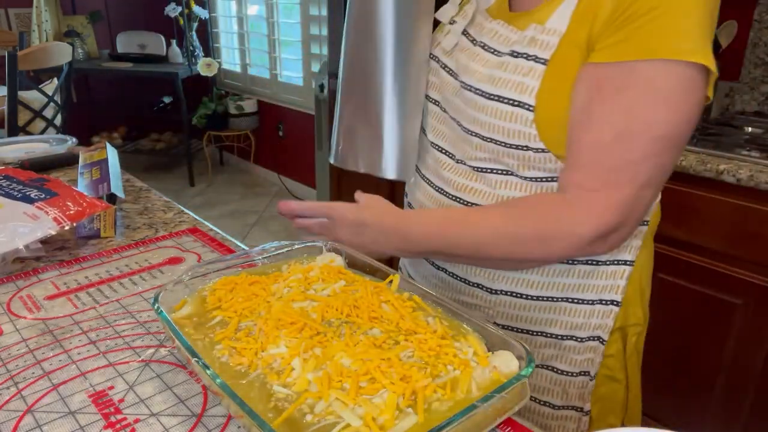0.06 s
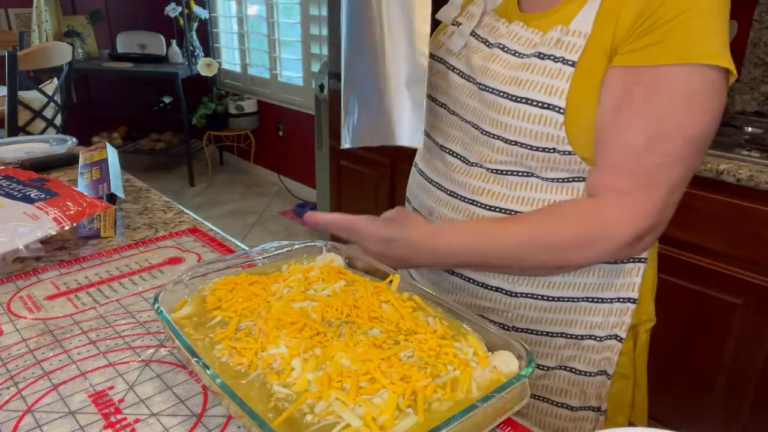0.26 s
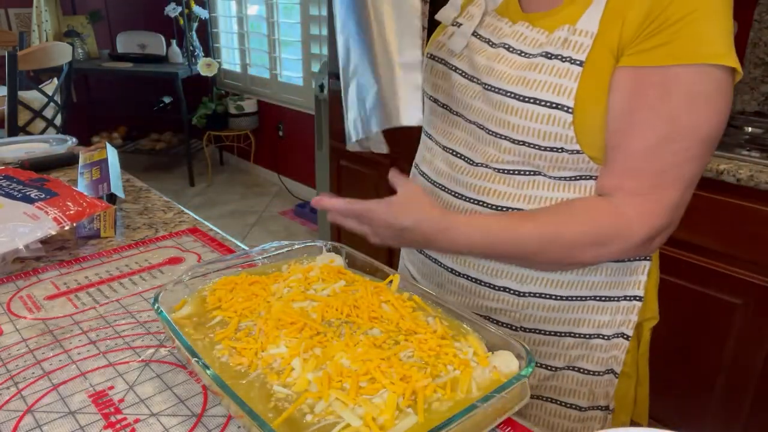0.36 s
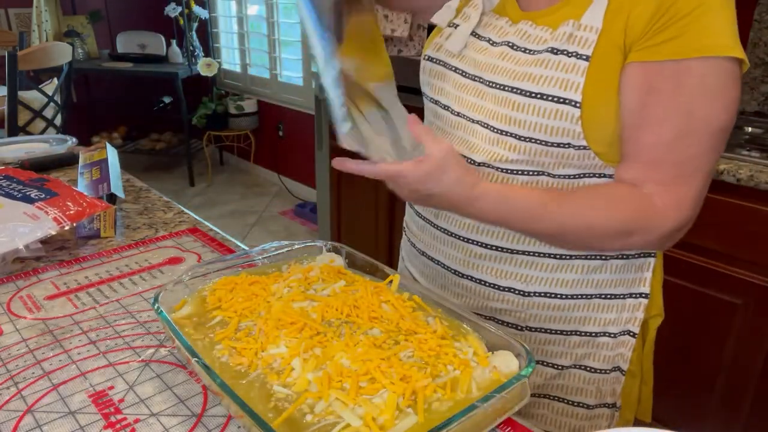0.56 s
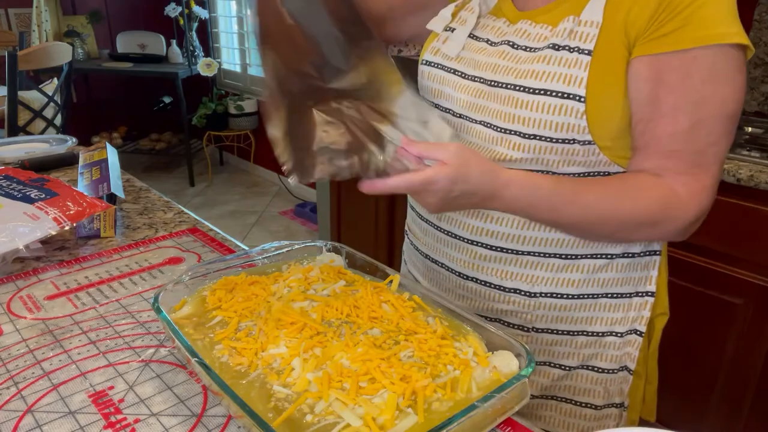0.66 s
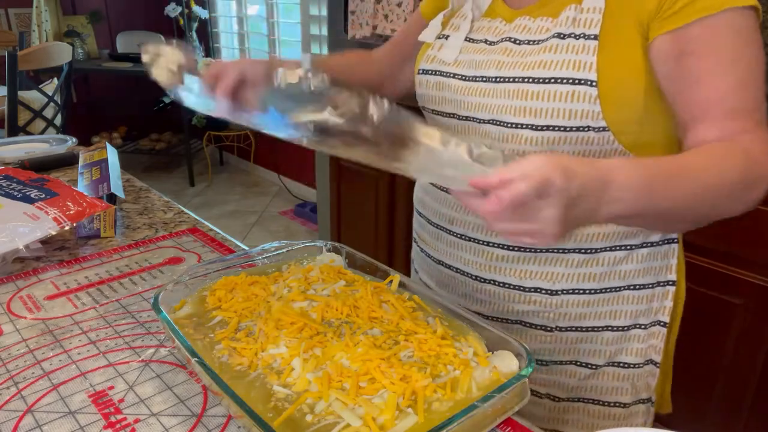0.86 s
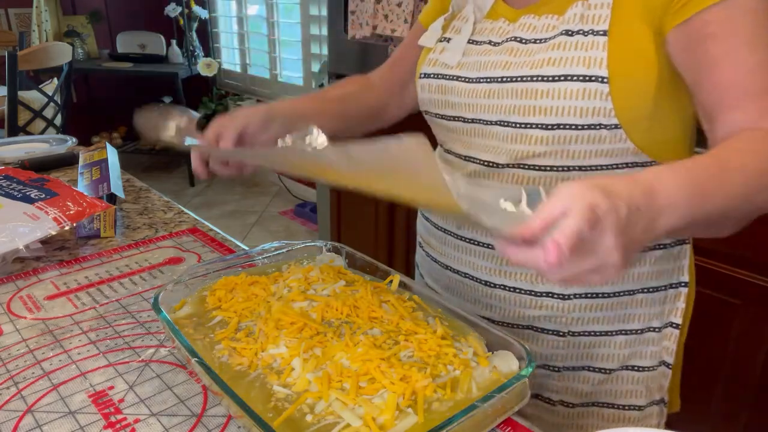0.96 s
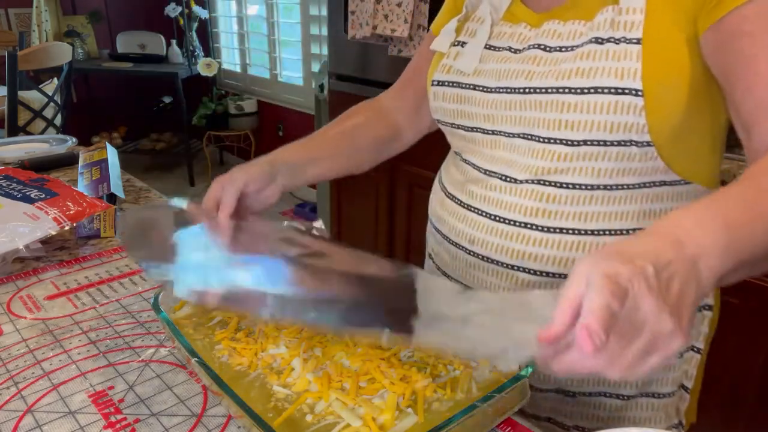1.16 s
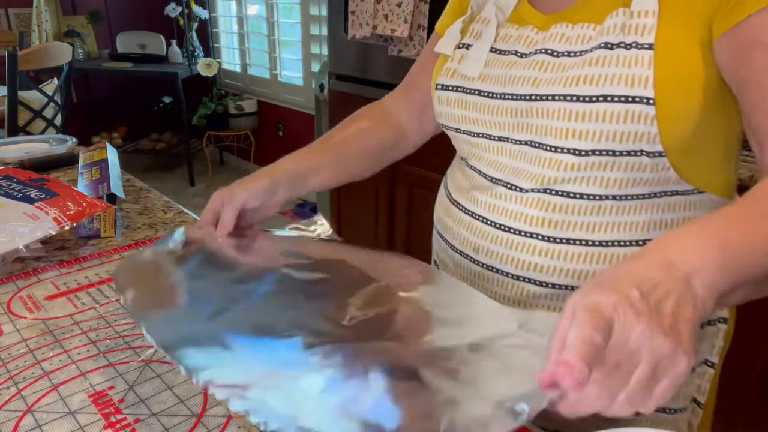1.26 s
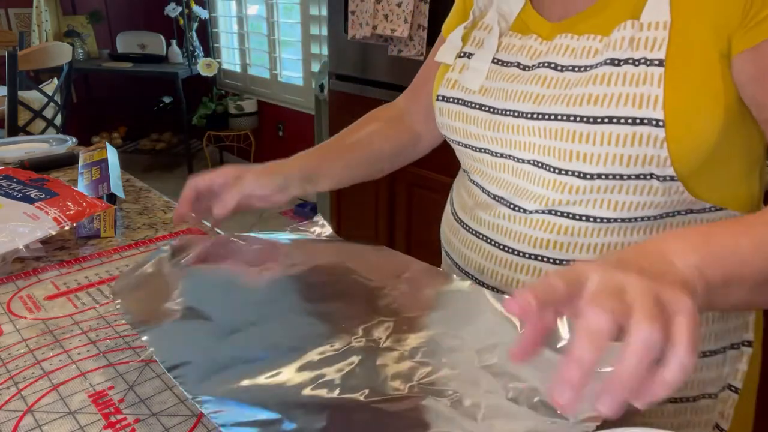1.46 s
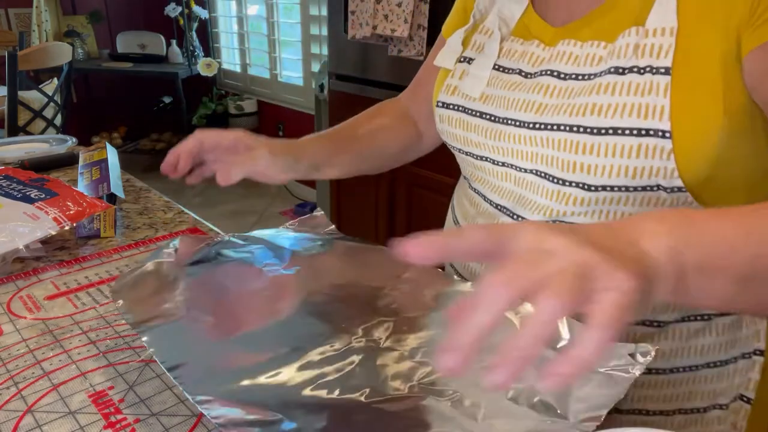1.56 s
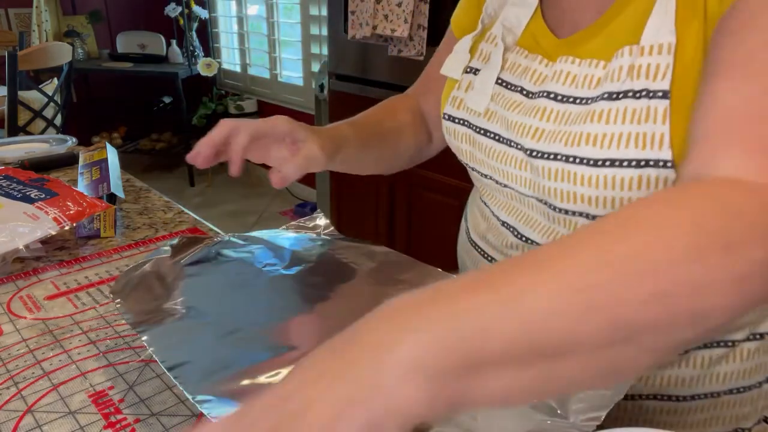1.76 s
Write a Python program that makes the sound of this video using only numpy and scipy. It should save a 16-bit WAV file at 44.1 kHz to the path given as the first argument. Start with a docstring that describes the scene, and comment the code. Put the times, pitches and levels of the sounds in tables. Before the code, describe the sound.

Aluminium foil crinkles in a kitchen with low machine hum. Faint rustles come first, with two dull knocks and soft thumps from 0.2 to 0.45 s. From 0.55 s crackling grows, loudest and brightest at 0.62-0.82 s with sharp snaps. Lighter rustling continues, with a crisp tick near 0.97 s and fresh crumpling at 1.1-1.45 s, fading by 1.5 s into the room's short ring and quiet hum.

```python
"""Aluminium foil is lifted, spread and laid over a glass dish: each move of the hands is a shower of clicks.
Between moves the sheet rustles, its panels flex with a duller crackle, and a few creases snap as single clicks.
Early on something is bumped: dull knocks of short modes and low noise, and soft thumps of swelling noise.
The place is a lively kitchen with low machine noise and steady hum tones, heard through a microphone pair."""
import sys
import numpy as np
from scipy import signal
from scipy.fft import rfft, irfft
from scipy.io import wavfile
from scipy.ndimage import uniform_filter1d

SR = 44100
rng = np.random.default_rng(int(sys.argv[2]) if len(sys.argv) > 2 else 0)


def dump_mix(stems):
    """Bounce the given channels to the path in sys.argv[1] as a 16-bit WAV at rate SR."""
    frames = np.atleast_2d(stems).T  # one column per channel
    limited = np.clip(frames, -1, 1)  # hard clip at full scale
    pcm = np.round(limited * 32767).astype(np.int16)
    wavfile.write(sys.argv[1], SR, pcm)


N = 79380  # samples, 1.8 s


def amp(db):
    """Turns decibels into an amplitude factor."""
    return 10 ** (np.asarray(db) / 20)


def unit(x):
    """Scales to rms 1."""
    return x / np.sqrt(np.mean(x ** 2) + 1e-20)


def read(points, hz):
    """Reads a table on a logarithmic frequency axis."""
    f, value = np.transpose(points)
    return np.interp(np.log(hz + 1), np.log(f + 1), value)


def add(mix, start_s, sound):
    """Mixes a sound in at its start time, cut off at the end of the mix."""
    part = mix[max(round(start_s * SR), 0):][:len(sound)]
    part += sound[:len(part)]


TILT_PIVOT_HZ = 4500  # a tilt leaves this frequency unchanged


def colour(x, spectrum, tilt_db=0, size=4096):
    """A causal minimum-phase filter of unit energy, with the given spectrum and tilt in dB per octave."""
    hz = abs(np.fft.fftfreq(size, 1 / SR))
    octaves = np.log2(np.maximum(hz, 100) / TILT_PIVOT_HZ)
    gain = amp(read(spectrum, hz) + tilt_db * octaves)
    # the Hilbert transform of the log gain supplies the minimum phase
    response = np.exp(np.conj(signal.hilbert(np.log(gain))))
    taps = np.fft.ifft(response).real[:size // 2]
    return signal.fftconvolve(x, taps / np.linalg.norm(taps))[:len(x)]


# Low machine noise of the kitchen, relative spectrum: pitch_hz, density_db (per Hz)
AIR_SPECTRUM = [(20, -25.5), (45, -15.5), (75, 5), (100, -11), (130, 0.5), (165, -2.5), (240, 0), (370, -4),
                (550, -14), (1100, -19.5), (2000, -25.5), (5000, -34.5), (9000, -44.5), (16000, -71)]
# Steady tones of the room: pitch_hz, level_db (rms)
HUM_TONES = [(79, -55), (131, -53), (203, -58), (249, -55), (1152, -66)]
AIR_DB = -43  # rms in each view, before the microphones


def background():
    """Two unrelated views of shaped noise, and one sum of steady sine tones."""
    t = np.arange(N) / SR
    hum = sum(amp(db) * np.sqrt(2) * np.sin(2 * np.pi * (hz * t + rng.random())) for hz, db in HUM_TONES)
    gain = amp(read(AIR_SPECTRUM, np.fft.rfftfreq(N, 1 / SR)))
    air = [unit(irfft(rfft(noise) * gain, N)) for noise in rng.standard_normal((2, N))]
    return amp(AIR_DB) * np.array(air), hum


# How long the kitchen rings: pitch_hz, t60_s
ROOM_DECAY = [(150, 0.32), (1000, 0.37), (3500, .4), (8000, 0.29), (15000, 0.11)]


def room(x, count=3):
    """Diffuse kitchen tails, each band dying at its own speed; the moving sheet feeds them in turn."""
    noise = rng.standard_normal((count, SR * 2 // 3))
    hz, t, bands = signal.stft(noise, SR, nperseg=256)
    decay = amp(-60 * t / read(ROOM_DECAY, hz)[:, None])
    tails = signal.istft(bands * decay, SR)[1]
    tails *= np.minimum(np.arange(tails.shape[1]) / SR / 0.0013, 1)  # 1.3 ms onset
    tails /= np.linalg.norm(tails, axis=1, keepdims=True)
    # the feed of each tail swings through a half cycle in 0.16 s, evenly staggered
    half_cycles = np.arange(N) / SR / .16 + np.arange(count)[:, None] / count
    turns = np.cos(np.pi * half_cycles) * np.sqrt(2 / count)
    return signal.fftconvolve(x * turns, tails, axes=1).sum(0)[:N]


# Soft low thumps of things shifting: start_s, rise_s, decay_s (to 1/e), level_db
THUMPS = [(.222, .01, .05, -44), (.29, .015, .055, -37), (.406, .018, .042, -35)]
# Colour of a thump, relative: pitch_hz, density_db (per Hz)
THUMP_SPECTRUM = [(20, -29), (45, -14), (80, -10.5), (130, 4.5), (200, -30), (300, -4), (600, -20),
                  (2000, -68)]


def thumps():
    """Low puffs of noise that swell softly and die away."""
    t, out = np.arange(SR // 2) / SR, np.zeros(N)
    for start_s, rise_s, decay_s, level_db in THUMPS:
        envelope = np.minimum(t / rise_s, 1) * np.exp(-np.maximum(t - rise_s, 0) / decay_s)
        puff = unit(colour(rng.standard_normal(len(t)), THUMP_SPECTRUM))
        add(out, start_s, amp(level_db) * envelope * puff)
    return out


# Dull knocks: start_s, level_db (scales ring and thud), tilt_db (per octave)
KNOCKS = [(.219, -31, 0.5), (.268, -36.5, -6)]
# What the bumped thing rings with: pitch_hz, level_db (relative, before tilt), t60_s
KNOCK_MODES = [(137, -21, 0.23), (209, 11, 0.26), (244, -6, 0.76), (351.8, 11, 0.38), (450, 11, .16),
               (665, -25, .1), (688, 17, 0.05), (846, -1, 0.13), (1216, 1, 0.085)]
# Colour of the low noise in a knock, relative: pitch_hz, density_db (per Hz)
THUD_SPECTRUM = [(40, -8), (90, -15), (300, 5), (700, -2.5), (1200, -10.5), (3000, -17), (9000, -96)]
RING_DB, THUD_DB = -9, -2  # relative gains of the two parts
THUD_DECAY_S, KNOCK_RISE_S = 0.091, 0.0013  # noise decay to 1/e before colouring; linear onset


def knocks():
    """A soft blow: a puff of low noise and a few short modes."""
    t, out = np.arange(SR // 2) / SR, np.zeros(N)
    pivot_hz = KNOCK_MODES[1][0]
    for start_s, level_db, tilt_db in KNOCKS:
        ring = np.zeros(len(t))
        for hz, mode_db, t60_s in KNOCK_MODES:
            gain = amp(mode_db + tilt_db * np.log2(hz / pivot_hz))
            decay = np.exp(-np.log(1000) * t / t60_s)
            ring += gain * decay * np.sin(2 * np.pi * (hz * t + rng.random()))
        puff = rng.standard_normal(len(t)) * np.exp(-t / THUD_DECAY_S)
        thud = colour(puff, THUD_SPECTRUM, tilt_db)
        onset = np.minimum(t / KNOCK_RISE_S, 1)
        add(out, start_s, amp(level_db) * onset * (amp(RING_DB) * ring + amp(THUD_DB) * thud))
    return out


CLICKS_PER_S = 5000  # average rate
SIZE_SPREAD_DB = 2.5  # multiplied by an exponential draw of mean 1, capped at 4
CLUMP_S, CLUMP_DB = 0.0042, -1.3  # smoothing width of the clumping; level per unit of it
FACET_RING_S = 0.00093  # decay to 1/e; the facets range from 0.25 to 2 times this


def crackle(count=48):
    """A steady shower of clicks in clumps; every click rings one facet of the foil for an instant."""
    clumps = unit(uniform_filter1d(rng.standard_normal(N), max(int(CLUMP_S * SR), 1)))
    size_db = SIZE_SPREAD_DB * np.minimum(rng.exponential(1, N), 4) + CLUMP_DB * clumps
    sizes = amp(size_db) * rng.choice([-1, 1], N)
    at = np.flatnonzero(rng.random(N) < CLICKS_PER_S / SR)
    facet = rng.integers(0, count, N)[at]

    t = np.arange(SR // 300) / SR
    decay_s = FACET_RING_S * np.geomspace(.25, 2, count)[:, None]
    rings = rng.standard_normal((count, len(t))) * np.exp(-t / decay_s)
    rings /= np.linalg.norm(rings, axis=1, keepdims=True)

    # add up all overlapping rings sample by sample
    places = at[:, None] + np.arange(len(t))
    clicks = sizes[at, None] * rings[facet]
    shower = unit(np.bincount(places.ravel(), clicks.ravel(), N)[:N])
    # even out the level over 25 ms
    return shower / np.sqrt(uniform_filter1d(shower ** 2, SR // 40) + 1e-6)


# Rustle of the carried sheet, breakpoints: time_s, level_db
RUSTLE = [(.76, -54), (.81, -38.5), (.89, -34.5), (.955, -39.5), (1.01, -34.5), (1.11, -40), (1.19, -33),
          (1.29, -33.5), (1.42, -32.5), (1.47, -63)]
# Colour of the foil in rustle, snaps and crumples, before tilt: pitch_hz, density_db (per Hz)
FOIL_SPECTRUM = [(150, -25.5), (500, -15), (1000, -13), (1800, -6), (3200, -2), (4500, -1.5), (6000, -2),
                 (7600, -.5), (9000, -3.5), (10500, -6), (13000, -10.5), (15800, -16.5)]


def rustle():
    """Small creases keep working while the sheet is carried."""
    level_db = np.interp(np.arange(N) / SR, *np.transpose(RUSTLE), left=-120, right=-120)
    return colour(crackle() * amp(level_db), FOIL_SPECTRUM, tilt_db=-1.5)


# Single creases snapping: start_s, level_db (impulse before colouring)
SNAPS = [(.6568, -10), (.7437, -9), (.7727, -11), (.783, -14), (.974, -22), (1.238, -19), (1.3495, -15),
         (1.367, -15)]


def snaps():
    """Each crease lets go in a single large click: an impulse with the colour of the foil."""
    out = np.zeros(N)
    for start_s, level_db in SNAPS:
        add(out, start_s, amp([level_db]))
    return colour(out, FOIL_SPECTRUM, tilt_db=-1.0)


def swell(start_s, rise_s, hold_s, release_s):
    """The envelope of one move: it swells, holds and dies away exponentially."""
    t = np.arange(N) / SR - start_s
    return np.clip(t / rise_s, 0, 1) * np.exp(-np.maximum(t - rise_s - hold_s, 0) / release_s)


# Panels of the sheet flexing: start_s, rise_s, hold_s, release_s (to 1/e), level_db, pitch_hz
FLEXES = [(0.538, 0.0078, 0.094, .02, -46.5, 1300), (0.632, 0.011, 0.038, 0.04, -37, 1700),
          (0.752, 0.0076, 0.078, 0.013, -37.5, 1860), (0.724, .006, 0.068, 0.06, -34, 3700),
          (1.046, 0.026, 0.0078, 0.0068, -34, 3130), (1.222, 0.0088, 0.015, 0.049, -38, 1450),
          (1.231, 0.017, 0.016, 0.036, -33.5, 2830), (1.324, 0.027, 0.052, 0.024, -39, 1120),
          (1.49, 0.0083, 0.025, 0.0093, -49.5, 1400)]
# Colour of a flexing panel: pitch_ratio (multiple of its pitch_hz), density_db (per Hz, relative)
PANEL_SPECTRUM = [(.1, -14), (.35, -14), (.7, -5.5), (1.0, 0.5), (1.35, -5), (2.2, -5), (5, -36), (14, -41)]


def flexes():
    """A duller crackle: clicks ring a whole panel of the sheet around its own pitch."""
    shower, out = crackle(), np.zeros(N)
    for *shape, level_db, pitch_hz in FLEXES:
        clicks = swell(*shape) * np.roll(shower, rng.integers(N))
        out += amp(level_db) * colour(clicks, np.array(PANEL_SPECTRUM) * [pitch_hz, 1])
    return out


# Hand moves crumpling the sheet: start_s, rise_s, hold_s, release_s (to 1/e), level_db, tilt_db (per octave)
CRUMPLES = [(-.03, 0.014, 0.071, 0.06, -46, -7), (0.142, .005, 0.011, .008, -52, 5),
            (0.166, 0.0047, 0.015, 0.014, -39, -1.8), (0.198, 0.0044, 0.022, 0.049, -42.5, -4),
            (.367, 0.0023, 0.022, 0.032, -49.5, -3.5), (0.535, 0.019, 0.027, 0.013, -39.5, -2),
            (0.582, 0.0055, 0.038, 0.0091, -36.5, -1.5), (0.621, 0.036, 0.014, 0.015, -22.5, 1.5),
            (0.68, 0.0087, 0.014, 0.029, -27.5, -1.7), (0.729, 0.0095, 0.016, 0.021, -21.5, 0.7),
            (.768, 0.0026, 0.028, 0.0092, -25.5, 2.8), (0.878, 0.0044, 0.006, 0.0296, -38.5, -4.5),
            (0.968, 0.0042, 0.0036, 0.0091, -28.5, 3), (1.109, 0.004, 0.027, 0.033, -35, 0.7),
            (1.236, 0.004, 0.0052, 0.0067, -28.5, -1.5), (1.29, 0.065, 0.005, 0.012, -23, 1),
            (1.388, 0.0076, 0.036, 0.006, -32.5, 4.5), (1.466, 0.022, 0.017, 0.0036, -33, -3.5)]


def crumples():
    """Bright showers of buckling clicks as the hands bend the foil."""
    shower, out = crackle(), np.zeros(N)
    for *shape, level_db, tilt_db in CRUMPLES:
        clicks = swell(*shape) * np.roll(shower, rng.integers(N))
        out += amp(level_db) * colour(clicks, FOIL_SPECTRUM, tilt_db)
    return out


# Likeness of the two microphones: pitch_hz, likeness (0 to 1)
MIC_LIKENESS = [(60, .92), (130, .85), (250, .62), (500, .25), (1200, .36), (2500, .33), (3300, .45),
                (4800, .15), (6700, .25), (8500, .82), (10000, .7), (11600, .88), (12900, .65),
                (14300, .85), (15500, .6)]
# Phase by which the left microphone leads: pitch_hz, lead_rad
MIC_LEAD = [(20, 0), (250, -.1), (600, -1.0), (1300, -.4), (2500, -1.7), (3300, -.4), (4500, -1.2),
            (5400, -.3), (6500, .2), (7200, 2.2), (8800, 3.1), (11500, 6.2), (12200, 6.6), (14000, 9.3),
            (16000, 11.3)]
# Left microphone level minus right: pitch_hz, difference_db
MIC_BALANCE = [(60, -.9), (250, -2), (600, -3.3), (2000, -2.6), (4000, -1), (8000, .2), (15000, -.4)]


def microphones(pair):
    """Two views of the sound become left and right, partly alike and slightly apart in time."""
    hz = np.fft.rfftfreq(2 * N, 1 / SR)
    first, second = rfft(pair, 2 * N)
    alike = np.clip(read(MIC_LIKENESS, hz), 0, 1)
    lean = amp(read(MIC_BALANCE, hz) / 2)
    blend = alike * first + np.sqrt(1 - alike ** 2) * second
    right = blend * np.exp(-1j * read(MIC_LEAD, hz))
    return irfft(np.array([first * lean, right / lean]))[:, :N]


DIRECT_DB, ROOM_DB, KNOCK_ROOM_DB = 0, -2.34, -5  # foil direct; foil and snaps, bumps into the room


def scene():
    """Foil and bumps, direct and through the kitchen; snaps and bumps reach only the first view directly."""
    air, hum = background()
    snap, bump, views = snaps(), knocks() + thumps(), []
    for side in range(2):
        foil = crumples() + flexes() + rustle()
        direct = amp(DIRECT_DB) * foil + (snap + bump) * (side == 0)
        into_room = amp(ROOM_DB) * (foil + snap) + amp(KNOCK_ROOM_DB) * bump
        views.append(direct + room(into_room))
    return microphones(np.array(views) + air) + hum


EDGE_HZ = 15950  # low-pass cutoff


def record(dry):
    """The recorder's band limit: a steep low-pass filter."""
    taps = signal.firwin(511, EDGE_HZ, window=("kaiser", 9), fs=SR)
    return signal.oaconvolve(dry, taps[None], "same")


dry = scene()
out = record(dry)
dump_mix(out)
```